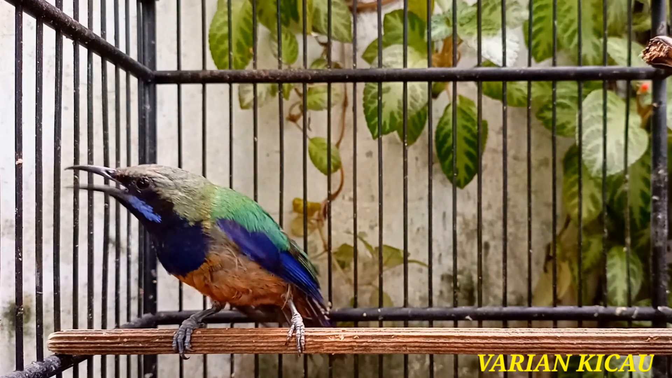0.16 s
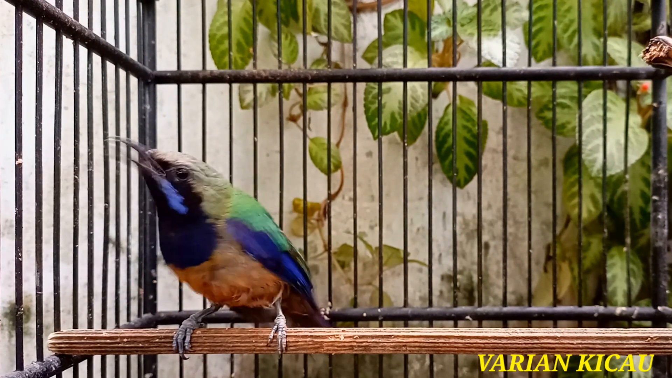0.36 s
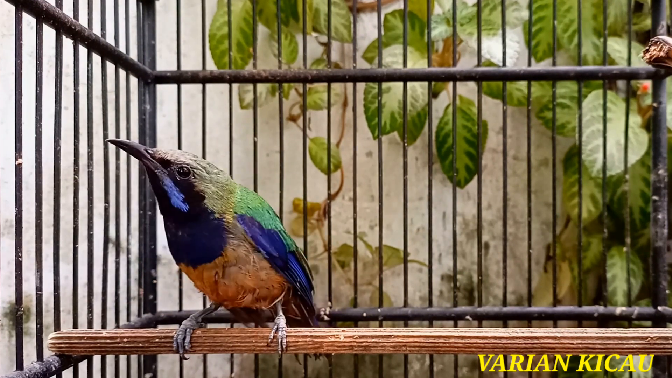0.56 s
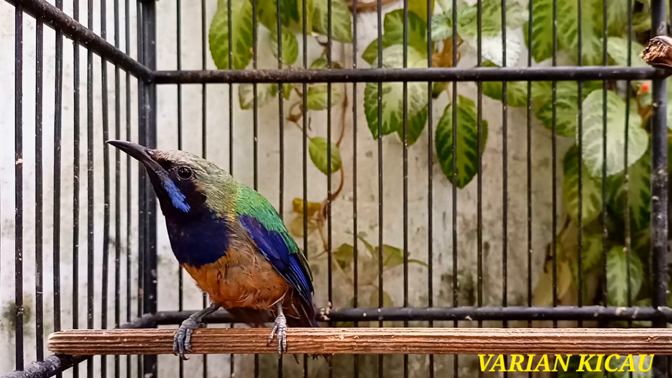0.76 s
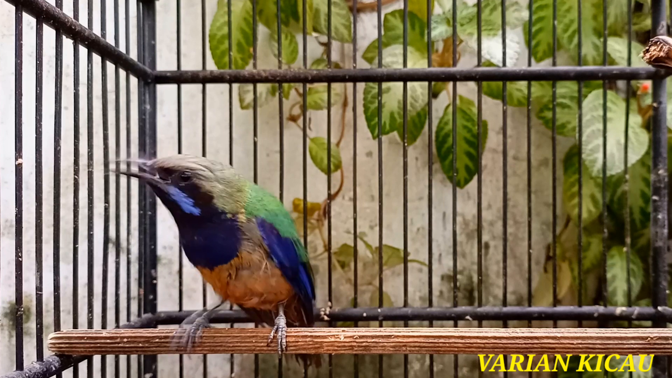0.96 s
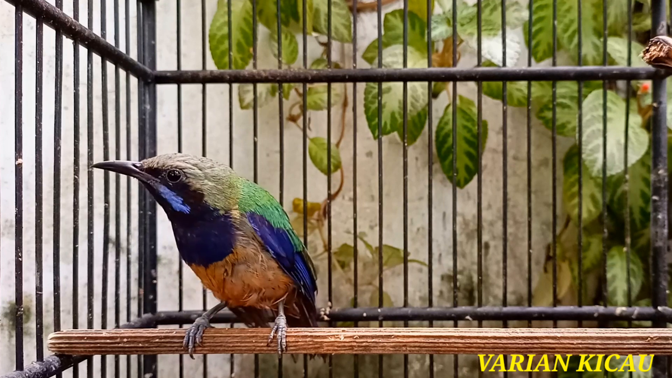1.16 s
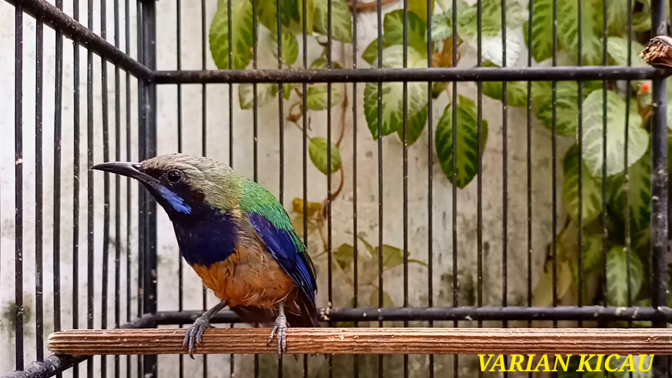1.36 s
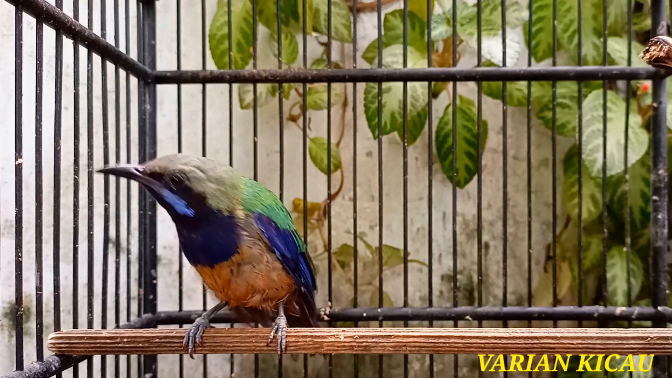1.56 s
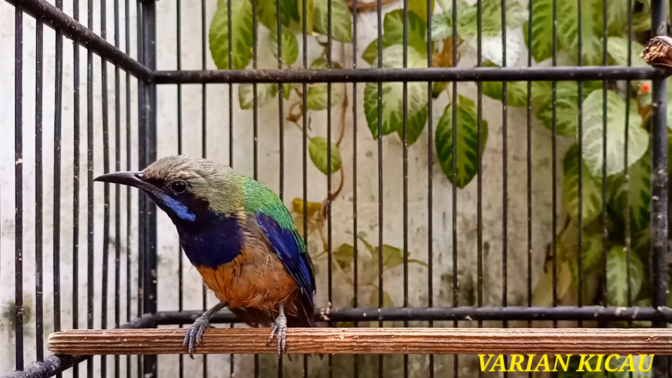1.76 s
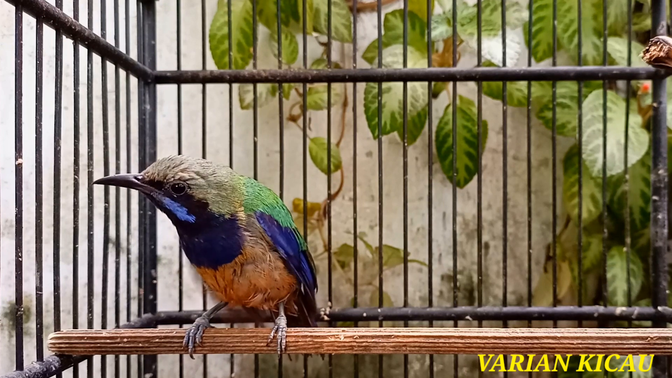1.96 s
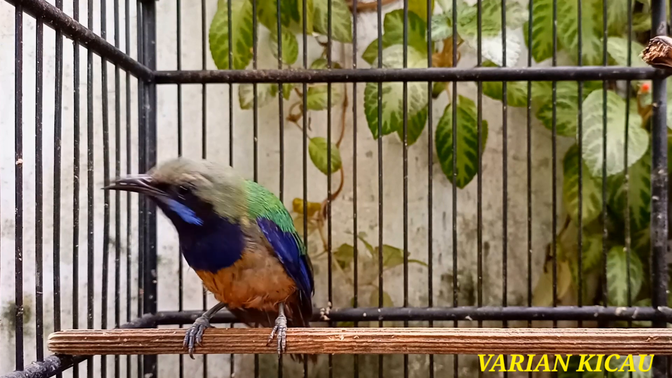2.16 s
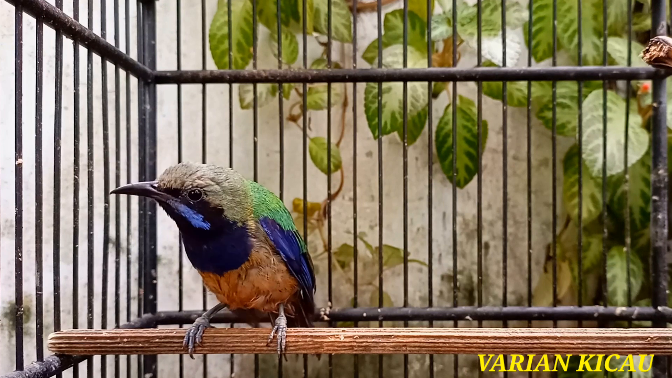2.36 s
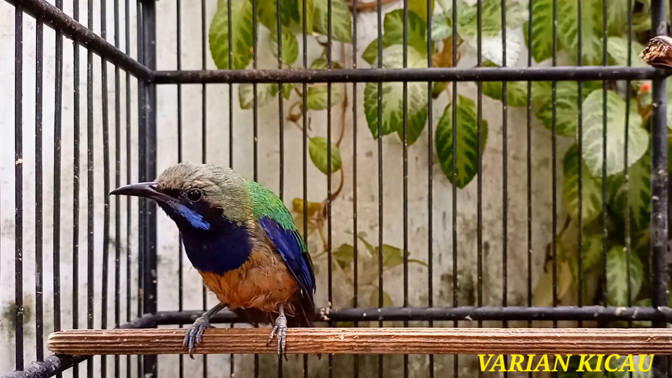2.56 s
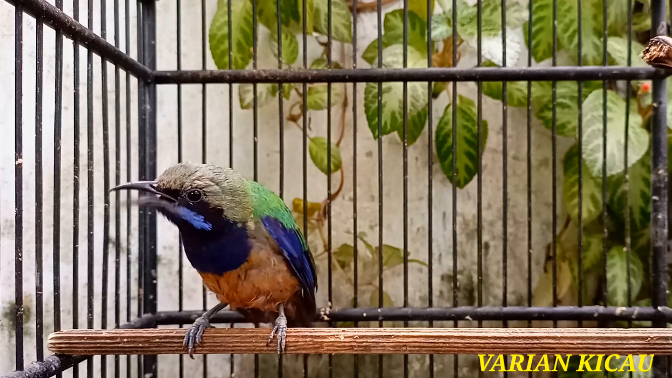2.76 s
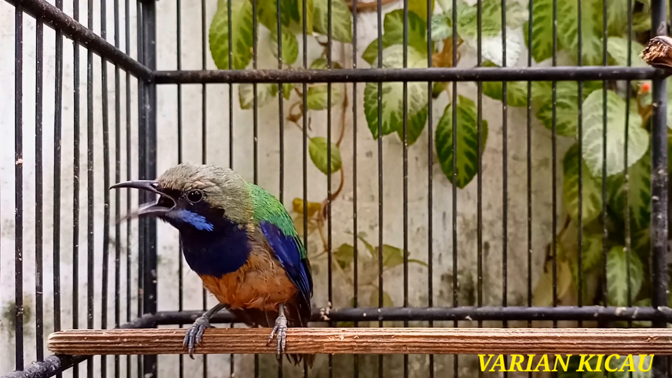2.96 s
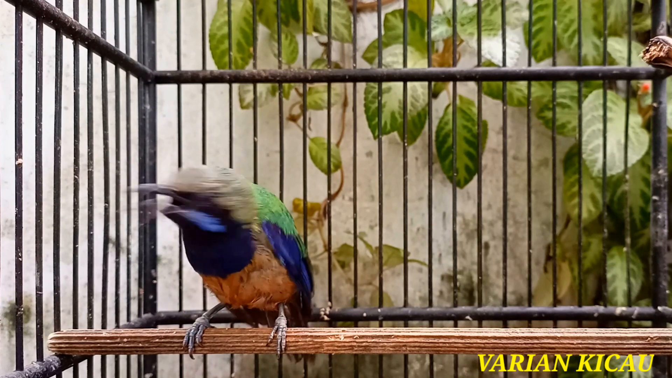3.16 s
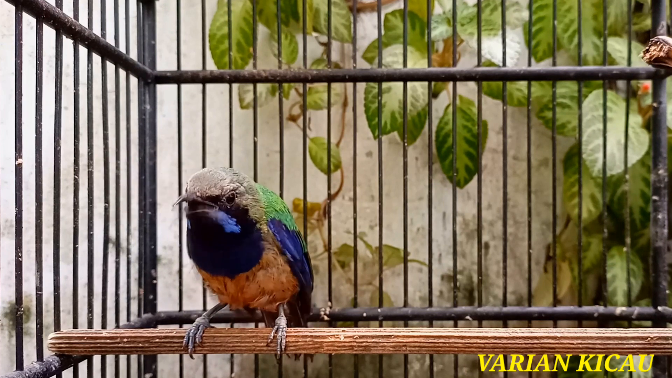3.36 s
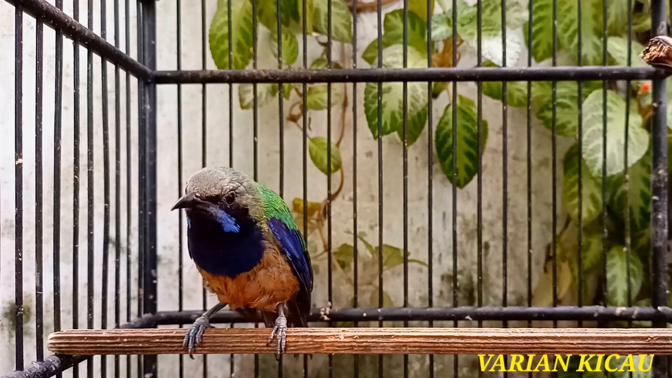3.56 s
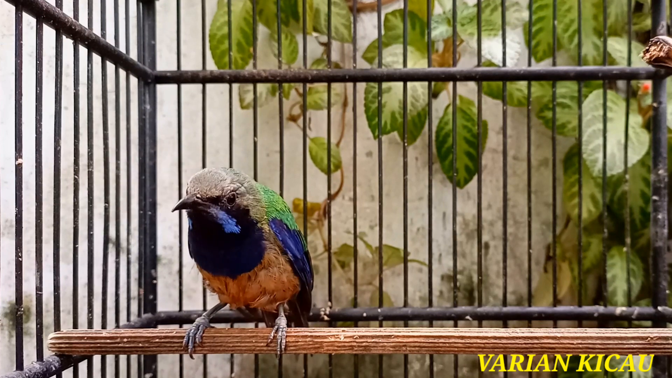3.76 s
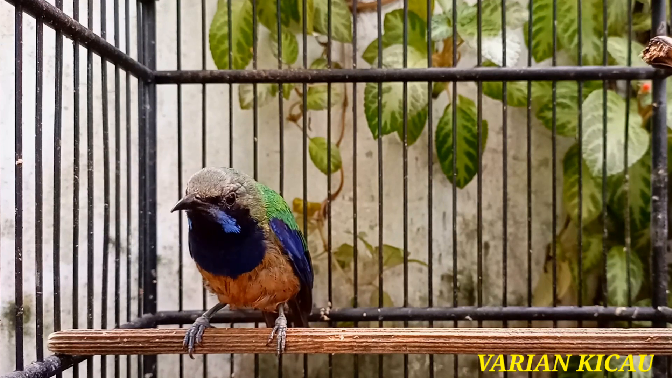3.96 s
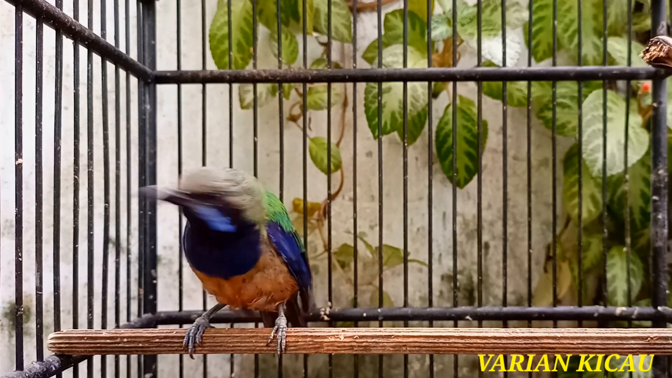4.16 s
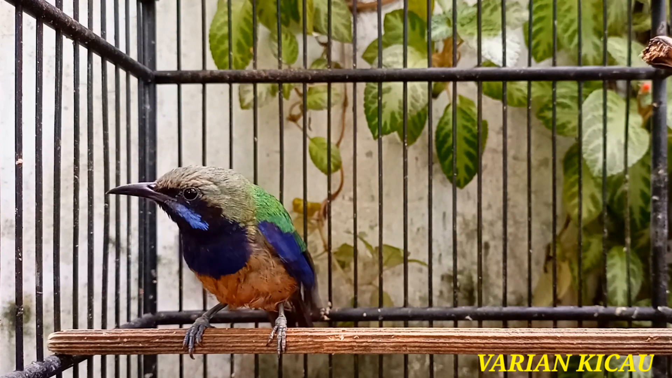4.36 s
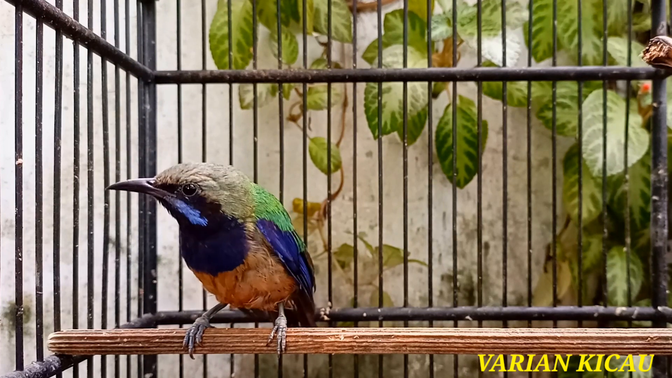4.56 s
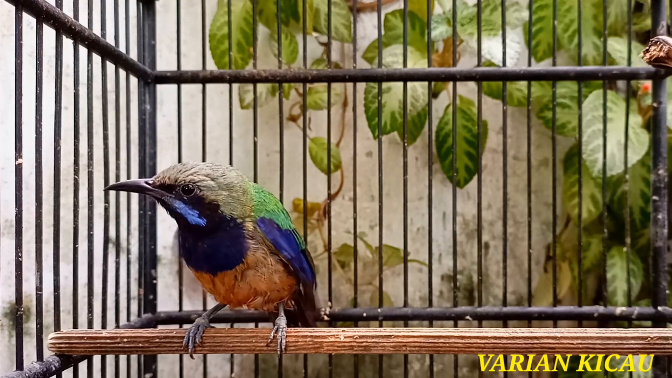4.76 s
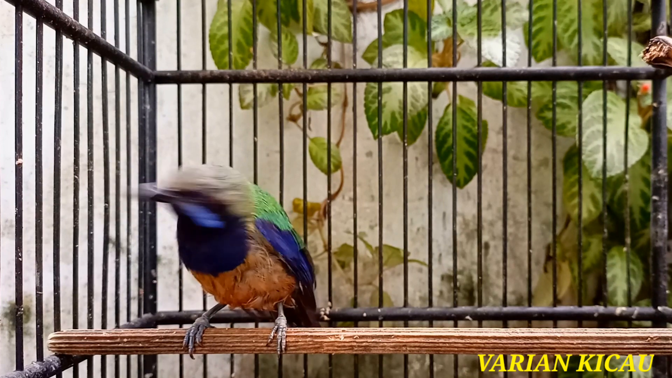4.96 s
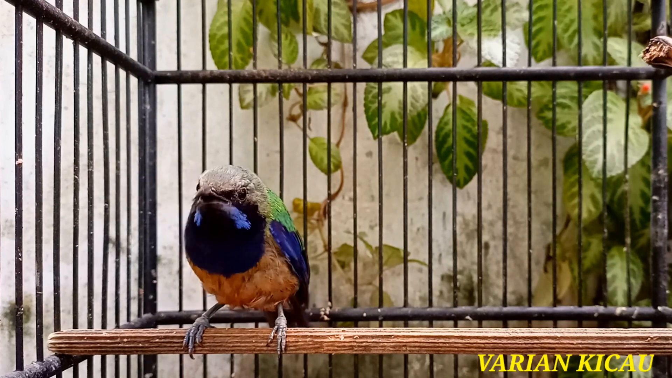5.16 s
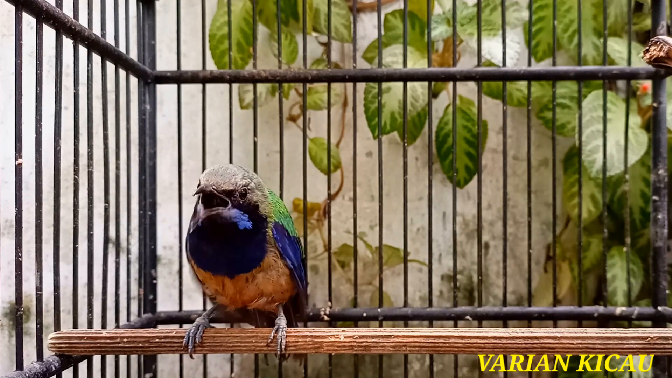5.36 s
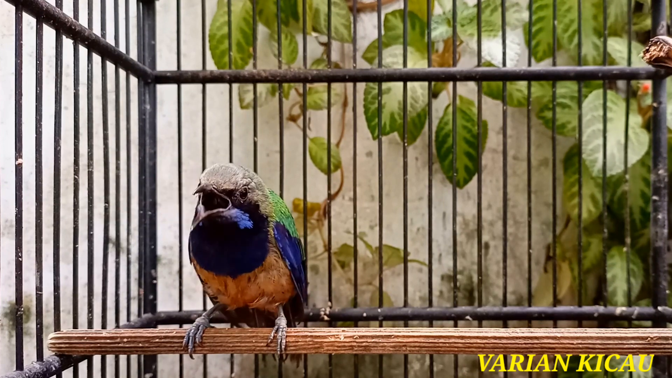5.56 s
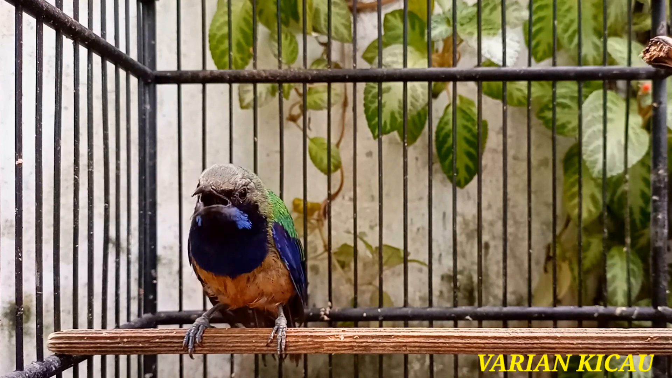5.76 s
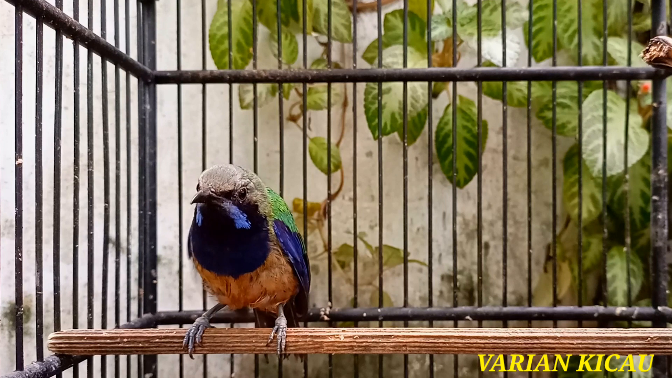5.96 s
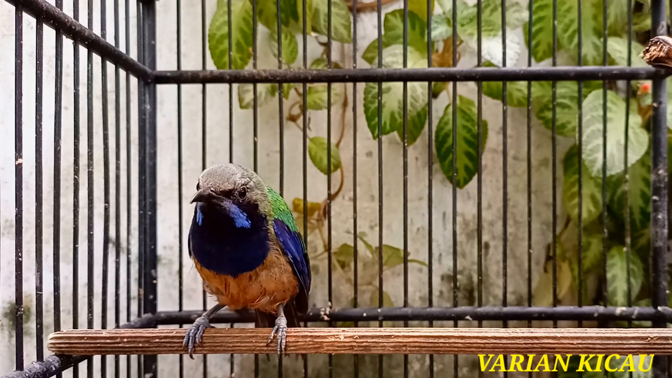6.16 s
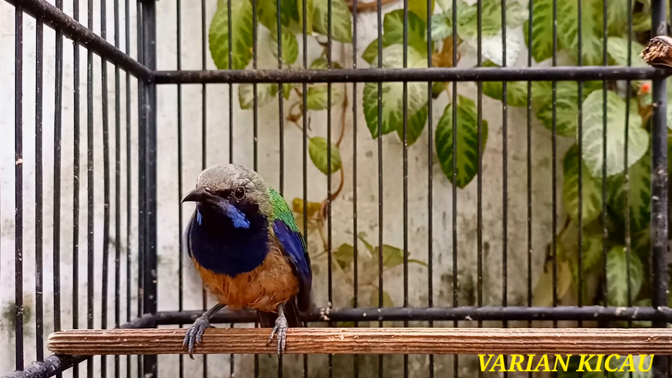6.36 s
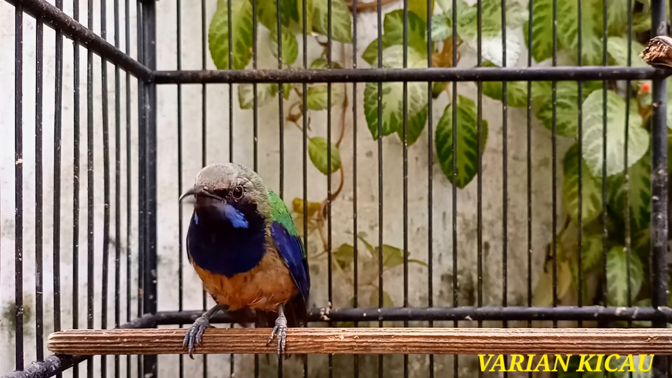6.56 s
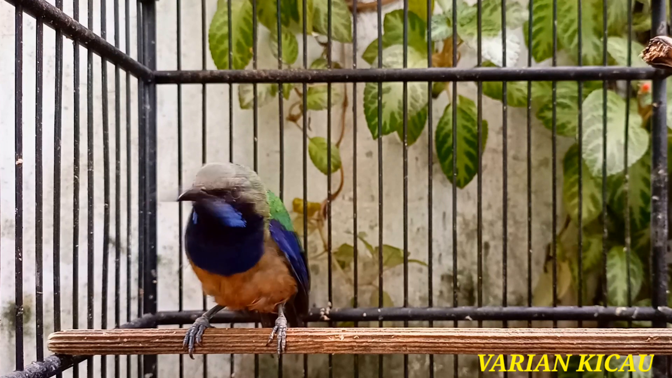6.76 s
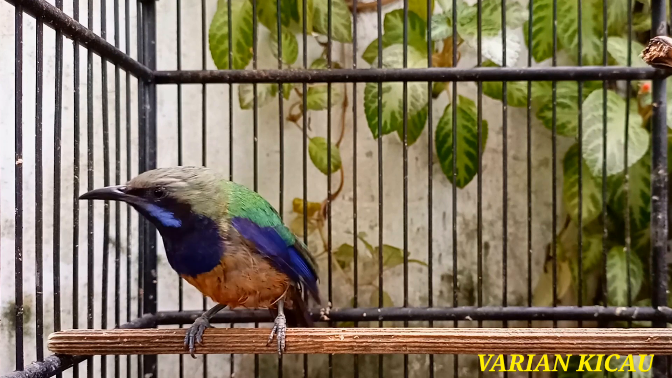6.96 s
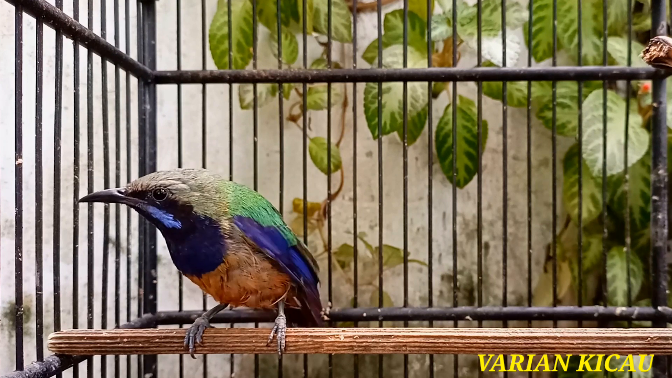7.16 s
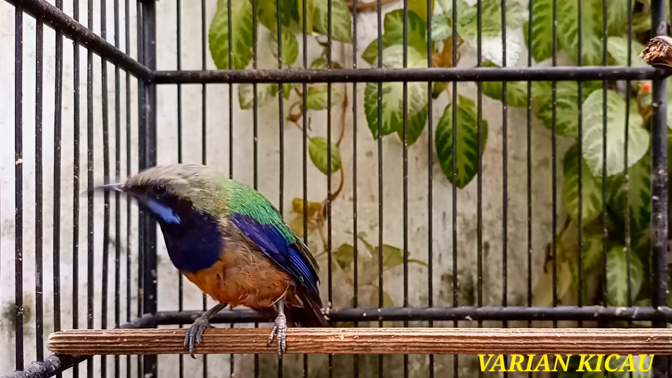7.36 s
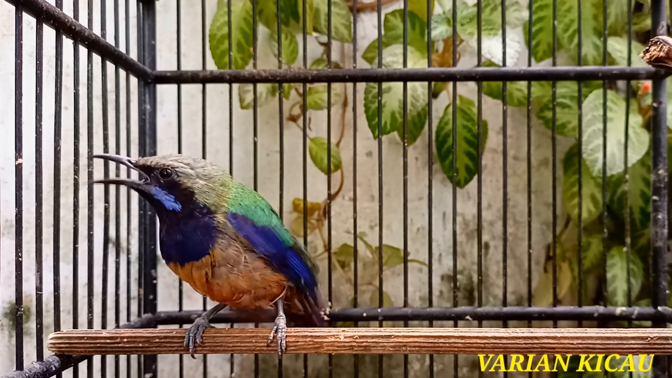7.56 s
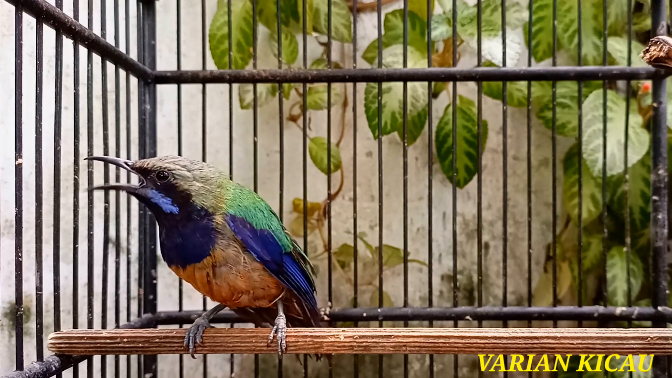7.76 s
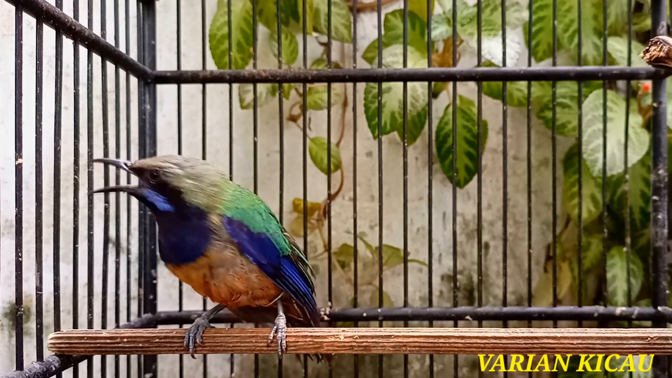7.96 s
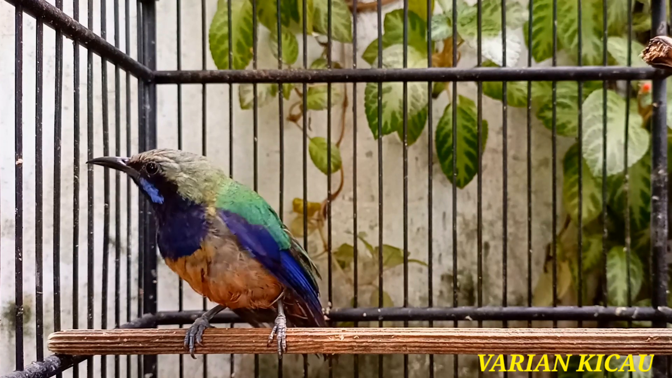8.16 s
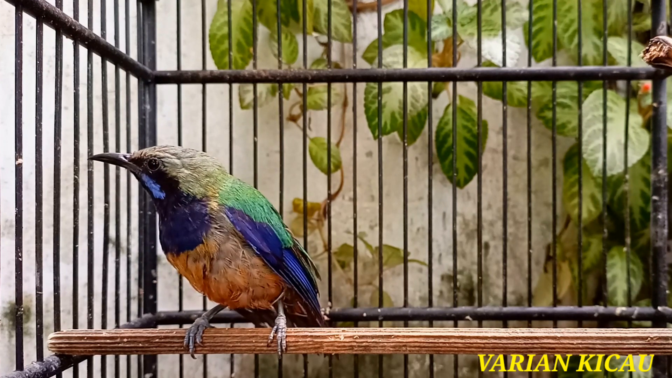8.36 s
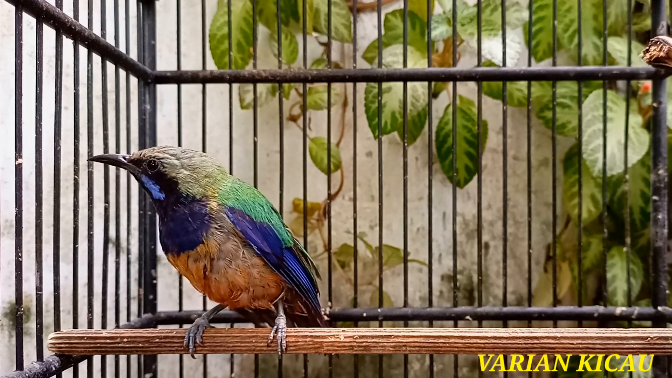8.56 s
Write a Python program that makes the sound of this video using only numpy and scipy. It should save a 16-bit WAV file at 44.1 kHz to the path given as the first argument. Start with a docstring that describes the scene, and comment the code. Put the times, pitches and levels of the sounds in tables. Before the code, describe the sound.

Close bird song: rasping, pulsed trills and piercing short falling chirps take turns, with brief wall echoes and a soft low rumble behind.

```python
"""A caged songbird near a wall opens with a buzzy trill, whose notes arch a whistle over a rough pulsed voice.
Two chirps follow: in each, a high voice slides down and breaks as a low voice takes over.
A second trill, a chirp, a third trill, a chirp and a last trill come next; echoes and a noise tail answer them.
Behind run a low hum in stretches of changing pitch, small sine thumps of the cage, and noise that drifts
unevenly in level; a faint wavering tone comes midway, and one far chip falls before the last trill."""
import sys
import numpy as np
from scipy import signal
from scipy.io import wavfile
from scipy.ndimage import uniform_filter1d

SR = 44100
rng = np.random.default_rng(int(sys.argv[2]) if len(sys.argv) > 2 else 0)


def bounce(signal):
    """Save signal as a 16-bit WAV file at the path given by the first command-line argument."""
    frames = np.transpose(np.atleast_2d(signal))
    limited = np.clip(frames, -1, 1)
    pcm = np.round(limited * 32767).astype(np.int16)
    wavfile.write(sys.argv[1], SR, pcm)


N = 380583


def gain_of(db):
    """Amplitude factor of a level in dB."""
    return 10 ** (np.asarray(db) / 20)


def evened(x):
    """The signal brought to rms 1."""
    return x / np.sqrt(np.mean(x ** 2) + 1e-20)


def read(points, hz):
    """Reads a curve of (frequency, value) points along a logarithmic frequency axis."""
    f, value = np.transpose(points)
    return np.interp(np.log(hz + 1), np.log(f + 1), value)


def add(mix, s, sound):
    """Lays a sound into the mix at s seconds, trimming what falls outside."""
    at = round(s * SR)
    sound = sound[max(-at, 0):]
    part = mix[max(at, 0):][:len(sound)]
    part += sound[:len(part)]


def wobble(n, hz):
    """Smooth chance of rms 1 that changes about hz times a second."""
    pad = round(SR / hz)
    noise = rng.standard_normal(n + 2 * pad)
    twice = uniform_filter1d(uniform_filter1d(noise, pad), pad)
    return evened(twice)[pad:-pad]


# trill notes: (top of the arch [s], length [ms], whistle level before the throat [dB], starting pitch [Hz])
TRILL_NOTES = [(0.004, 49.6, -17, 1770), (0.057, 56, -18.5, 1775), (0.106, 42.3, -18, 1750),
               (0.159, 37.6, -16, 1790), (0.24, 39.5, -20.5, 1507), (0.334, 45.5, -19.5, 1476),
               (0.416, 53.7, -21, 1497), (0.508, 51, -21, 1470), (0.612, 43.2, -21, 1474),
               (2.964, 45.7, -25, 1494), (3.002, 32, -14, 1996), (3.051, 31, -14.5, 1998),
               (3.091, 27, -15.5, 1963), (3.103, 28.8, -13.5, 2026), (3.148, 32, -13.5, 1970),
               (3.195, 36.4, -13, 2073), (3.241, 25, -17.5, 1978), (3.256, 26, -13.5, 2065),
               (3.308, 30.8, -14, 1998), (3.387, 39, -19, 1517), (3.405, 21, -23, 1555),
               (3.485, 35, -19.5, 1476), (3.597, 23.2, -23, 1447), (3.615, 29, -20, 1465),
               (5.39, 42.2, -19, 1768), (5.402, 30.3, -16.5, 1723), (5.437, 27.8, -14.5, 1791),
               (5.478, 22.6, -12.5, 1844), (5.527, 29.7, -15, 1933), (5.577, 33.5, -14.5, 1985),
               (5.632, 34.6, -13.5, 2080), (5.679, 26, -11, 2155), (5.73, 25.4, -11, 2394),
               (5.782, 27.8, -11.5, 2423), (5.834, 23.4, -11, 2583), (5.883, 21, -11, 2523),
               (5.939, 26, -12.5, 2694), (5.991, 21, -30.5, 1513), (7.752, 38, -21, 1670),
               (7.787, 21.8, -17, 1767), (7.801, 18.7, -16, 1831), (7.842, 36, -18, 1780),
               (7.886, 31.6, -15.5, 1990), (7.905, 21.3, -22, 1896), (7.944, 38.7, -17.5, 1873),
               (7.986, 29, -14, 2080), (8.036, 24, -13, 2170), (8.08, 28.5, -13.5, 2185),
               (8.095, 19, -17, 2080), (8.134, 25.3, -10.5, 2235), (8.185, 18, -12.5, 2323),
               (8.231, 21.4, -12, 2340), (8.244, 15.3, -17.5, 2290), (8.289, 28.2, -14, 2377)]
# turns of the head: (time [s], share heard side-on [0-1])
HEAD_TURNS = [(0, 0.93), (3.33, 0.84), (3.35, 0.1), (6.5, 0), (7.5, 0.9), (8.0, 0.44), (8.3, 0.15)]
# the throat's 3 kHz ring, a peak side-on and a dip from the front: (centre [Hz], width [Hz], lift [dB])
SIDE_RING = (3100, 110, 8.8)
FRONT_RING = (3100, 370, -4)


def trills():
    """All notes through the throat, crossfaded between side-on and frontal colour as the head turns."""
    out = np.zeros(N)
    for row in TRILL_NOTES:
        add(out, *voiced(*row))
    side = np.clip(np.interp(np.arange(N) / SR, *np.transpose(HEAD_TURNS)), 0, 1)
    return throat(side * out, SIDE_RING) + throat((1 - side) * out, FRONT_RING)


# how the starting pitch shapes a note; a tighter, higher start gives a purer one:
# (starting pitch [Hz], whistle top [Hz], rasp top [Hz], rasp against whistle [dB],
#  share of the note spent rising [0-1], lingering on the foot [power of the climb], slackness [0-1])
VOICE_BY_PITCH = [(1510, 6150, 3040, 10.5, .62, .9, 0.94), (1781, 7300, 3300, 3.5, 0.72, 2.4, .3),
                  (2054, 7300, 3200, 0.5, .6, 2.0, 0.1), (2260, 7350, 3100, -7, 0.69, 4.1, 0.2),
                  (2770, 7400, 3100, -7, 0.99, 3.6, 0.08)]


def voiced(s, length_ms, level_db, start_hz):
    """Sets a note's arch, rasp and slackness from the tightness of voice its starting pitch implies."""
    starts, *columns = np.transpose(VOICE_BY_PITCH)
    top_hz, rasp_hz, rasp_db, share, linger, slack = (np.interp(start_hz, starts, c) for c in columns)
    rise_ms, fall_ms = share * length_ms, (1 - share) * length_ms
    return note(s, rise_ms, fall_ms, top_hz, level_db, level_db + rasp_db,
                start_hz, rasp_hz, linger, np.clip(slack, 0, 1))


FOOT_DB = -12.5  # clean tone on the rise, against the rasp


def note(s, rise_ms, fall_ms, top_hz, whistle_db, rasp_db, start_hz, rasp_hz, linger, slack):
    """One arch: both voices climb, turn and fall back; the rasp is a pulse train that grows unsteady."""
    rise = np.arange(-1, 0, 1000 / SR / max(rise_ms, 1))
    fall = np.arange(0, 1, 1000 / SR / max(fall_ms, 1))
    u = np.concatenate([rise, fall])  # -1 at the start, 0 at the top, 1 at the end
    n, bow, rising = len(u), np.cos(np.pi / 2 * u), u < 0
    arch = bow ** np.where(rising, linger, 1.1)
    rough = np.where(rising, arch, 1)

    # whistle: a tone and an equally strong octave
    hz = (start_hz + (top_hz - start_hz) * arch) * (1 + (0.014 + 0.095 * slack) * wobble(n, 900))
    phase = 2 * np.pi * np.cumsum(hz) / SR
    whistle = np.sin(phase) + np.sin(2 * phase)
    # fast random flutter of the level blurs the whistle into a fuzzy band
    whistle *= 1 + 0.22 * wobble(n, 1700)
    # the way down is fainter
    whistle *= np.where(rising, arch ** 1.2, bow ** 2.8)

    # rasp: nine partials with spread phases, kept below the top of the band
    pitch = (start_hz + (rasp_hz - start_hz) * arch) * (1 + .04 * rough * wobble(n, 800))
    turns = 2 * np.pi * (np.cumsum(pitch) / SR + rng.random())
    pulses = sum(np.cos(k * turns + .7 * k * k) * (k * pitch < SR / 2.3) for k in range(1, 10))
    # the slacker the voice, the more strong and weak pulses alternate and the more air leaks through
    pulses *= 1 + 1.8 * slack * np.cos(turns / 2)
    unsteady = evened(pulses) * (1 + 2.5 * rough * wobble(n, 1200))
    air = (0.14 + 0.35 * slack) * rough * rng.standard_normal(n)
    swell = bow ** np.where(rising, 1.3 - .5 * slack, .9)
    rasp = evened(unsteady + air) * swell * gain_of(1.4 * wobble(n, 230))

    # foot: a clean tone that swells and fades within the rise
    foot = 1.2 * (1 - 0.21 * slack) * np.cos(turns) + np.cos(2 * turns)
    foot += 0.77 * slack * np.cos(turns / 2)
    foot *= np.sin(np.pi * np.clip(-u, 0, 1))
    rough_voice = gain_of(rasp_db) * (rasp + gain_of(FOOT_DB) * foot)
    return s - rise_ms / 1000, np.sqrt(2) * gain_of(whistle_db) * whistle + rough_voice


# broad colour of throat and beak: (frequency [Hz], level [dB])
THROAT_COLOUR = [(450, -55), (800, -34.5), (1300, -35.5), (2500, -20.5), (3400, -13), (5200, -4),
                 (6300, -4), (7400, -6), (8300, -11), (10500, -17), (16000, -26.5)]
# narrow resonances of windpipe and beak: (centre [Hz], width [Hz], lift [dB])
PIPE_RESONANCES = [(740, 200, 7), (1820, 250, 9), (3760, 300, 8.5), (4414, 280, 7.5), (6340, 180, 3.5),
                   (6600, 250, 3.5), (7330, 350, 3.5)]


def throat(x, ring):
    """The broad throat colour with its narrow resonances, as one filter."""
    hz = np.linspace(0, SR / 2, 1025)
    lift_db = sum(db / (1 + (2 * (hz - f) / width) ** 2) for f, width, db in PIPE_RESONANCES + [ring])
    taps = signal.firwin2(1023, hz, gain_of(read(THROAT_COLOUR, hz) + lift_db), fs=SR)
    return signal.oaconvolve(x, taps, "same")


# chirps: (break of the high voice [s], high voice level [dB], low voice level [dB], speed [factor])
CHIRPS = [(1.158, -15, -16.5, 0.97), (2.338, -16, -16.5, 0.94), (4.278, -14.5, -16, 0.94),
          (6.745, -15, -15.5, 1)]
# the two voices: (time from the break at speed 1 [ms], pitch [Hz], level against its voice [dB])
HIGH_VOICE = [(-33, 8750, -29.5), (-27.5, 8370, -1), (-23.5, 7800, -5.5), (-12.5, 7500, 0.5),
              (-5.5, 7350, -2.5), (5, 5410, -5), (4, 5300, -21)]
LOW_VOICE = [(-7, 11000, -34), (-2.5, 4600, -8.5), (2.5, 4200, -6), (11.5, 3900, -7.5), (16.5, 3750, 0.5),
             (33, 3720, -3.5), (43, 4000, -20.5)]
# partials from the 2nd up: (level against the fundamental [dB])
HIGH_OVERTONES = [-27.5]
LOW_OVERTONES = [-22.5, -25, -35.5]
# faint fuzz of air: (time from the break at speed 1 [ms], centre [Hz], level against the low voice [dB])
AIR_FUZZ = [(-21, 4100, -44.5), (-11.5, 4100, -36), (-6.5, 4500, -38.5), (-1.5, 9700, -23.5),
            (0, 9400, -22), (9.5, 13000, -25.5), (20.5, 3900, -38)]


def chirps():
    """The high voice slides down and breaks as the low voice takes over, with a fuzz of air around it."""
    out = np.zeros(N)
    for s, high_db, low_db, speed in CHIRPS:
        def placed(shape, db):
            return [(s + ms / speed / 1000, hz, db + d) for ms, hz, d in shape]

        add(out, *glide(placed(HIGH_VOICE, high_db), HIGH_OVERTONES))
        add(out, *glide(placed(LOW_VOICE, low_db), LOW_OVERTONES))
        # strong fast wavering spreads the tone into fuzz
        add(out, *glide(placed(AIR_FUZZ, low_db), waver=.09, flutter_db=5, rate_hz=860))
    return out


def glide(rows, overtones=(), waver=.004, flutter_db=2.0, rate_hz=300):
    """A sine with overtones led through rows of (time [s], pitch [Hz], level [dB]), wavering by chance."""
    s, hz, db = np.transpose(rows)
    t = np.arange(s[0], s[-1], 1 / SR)
    pitch = np.interp(t, s, hz) * (1 + waver * wobble(len(t), rate_hz))
    phase = 2 * np.pi * (np.cumsum(pitch) / SR + rng.random())
    tone = np.sin(phase)
    for k, overtone_db in zip(range(2, 6), overtones):
        tone = tone + gain_of(overtone_db) * np.sin(k * phase)
    level = gain_of(np.interp(t, s, db) + flutter_db * wobble(len(t), rate_hz))
    return s[0], np.sqrt(2) * level * tone * signal.windows.tukey(len(t), .1)


# early echoes off wall, bars and perch: (delay [ms], level against the direct sound [dB])
EARLY_ECHOES = [(1.3, -15.5), (3.1, -9.5), (5.2, -9.5), (8.0, -9.5), (11.5, -15)]


def yard(x, tail_db):
    """Direct sound, early echoes, and three tails fed in turn, cycling 3.1 times a second."""
    early = np.zeros(2000)
    early[0] = 1
    for ms, db in EARLY_ECHOES:
        early[round(ms * SR / 1000)] = gain_of(db)
    turn = np.arange(N) / SR * 2 * np.pi * 3.1  # the feeds cycle at 3.1 Hz
    late = sum(tail(x * np.sqrt(2 / 3) * np.cos(turn + k * np.pi / 3)) for k in range(3))
    return signal.oaconvolve(x, early / np.linalg.norm(early))[:N] + gain_of(tail_db) * late


# main decay of the yard: (frequency [Hz], t60 [s])
YARD_DECAY = [(500, 0.22), (2000, 0.26), (4000, 0.18), (7500, 0.22), (11000, 0.24), (16000, 0.11)]
LINGER_DB, LINGER_T60_S = -15, 0.54  # a weaker, slower part of the tail


def tail(x, start_ms=6):
    """Sparse taps of random sign, each band dying at its own speed."""
    taps, first = np.zeros(SR), round(start_ms * SR / 1000)
    at = np.arange(first, SR - 16, 16)
    taps[at + rng.integers(0, 16, len(at))] = rng.choice([-1., 1.], len(at))
    hz, t, z = signal.stft(taps, SR, nperseg=128)
    decay = gain_of(-60 * t / read(YARD_DECAY, hz)[:, None])
    linger = gain_of(LINGER_DB - 60 * t / LINGER_T60_S)
    dying = signal.istft(z * (decay + linger), SR, nperseg=128)[1]
    return signal.fftconvolve(x, dying / np.linalg.norm(dying))[:N]


# a far bird's falling chip: (time [s], pitch [Hz], level before the distance mix [dB])
FAR_CHIP = [(7.047, 5040, -76), (7.056, 6160, -53), (7.064, 6070, -55), (7.07, 4480, -61),
            (7.08, 3090, -64.5)]
# a faint wavering tone from far off: (time [s], pitch [Hz], level before the distance mix [dB])
FAINT_TONE = [(4.42, 1156, -84), (4.5, 1148, -79), (4.57, 1138, -78.5), (4.61, 1119, -81.5),
              (4.64, 1115, -83.5)]


def far_calls():
    """Two strongly wavering glides, weak in direct sound and full in the yard's tail."""
    far = np.zeros(N)
    add(far, *glide(FAR_CHIP, waver=0.12, flutter_db=4.5, rate_hz=1100))
    add(far, *glide(FAINT_TONE, waver=0.097, flutter_db=3.5, rate_hz=210))
    return 0.35 * far + tail(far)


# steady stretches of hum: (start [s], length [s], pitch [Hz], first level [dB], last level [dB])
HUM_STRETCHES = [(0.021, 0.63, 82.5, -53, -56.5), (0.652, 2.07, 85.04, -57.5, -61),
                 (3.72, 1.75, 70.87, -53, -57.5), (5.97, 0.45, 84.4, -47.5, -59),
                 (6.518, 1.08, 82.47, -48, -51.5)]
HUM_RISE_S, HUM_FALL_S, HUM_EDGE_DB = 0.017, 0.025, -18


def hum():
    """A wavering low tone with weak overtones; each stretch sets in quickly and sinks."""
    out = np.zeros(N)
    for s, length, hz, first_db, last_db in HUM_STRETCHES:
        end = s + length
        rows = [(s, hz, first_db + HUM_EDGE_DB), (s + HUM_RISE_S, hz, first_db),
                (end - HUM_FALL_S, hz, last_db), (end, hz, last_db + HUM_EDGE_DB)]
        add(out, *glide(rows, [-26, -30], waver=0.005, flutter_db=4.5, rate_hz=36))
    return out


# low thumps: (time [s], level at the start of the decay [dB], pitch [Hz], t60 [s])
THUMPS = [(1.135, -25.5, 231, 0.011), (3.153, -34.5, 106, 0.054), (4.255, -35, 180, 0.025),
          (6.724, -42, 198, 0.048), (7.639, -42, 70, 0.28), (7.749, -43, 62.6, 0.27)]


def thumps():
    """Soft short pushes through the cage and the microphone: dying sines that fade in over half a cycle."""
    out, t = np.zeros(N), np.arange(SR // 2) / SR
    for s, db, hz, t60 in THUMPS:
        fade_in = np.minimum(t * hz * 2, 1)
        add(out, s, gain_of(db - 60 * t / t60) * np.sin(2 * np.pi * hz * t) * fade_in)
    return out


# spectrum shape of the background: (frequency [Hz], relative density [dB per Hz])
FLOOR_SHAPE = [(13, -64.5), (22, -34), (32, -20.5), (61, 1), (80, -0.5), (94, -16), (150, -21.5),
               (233, -23), (477, -37), (1280, -47.5), (3950, -46), (4790, -45), (6840, -46), (10300, -58.5),
               (15600, -72.5)]
FLOOR_DB = -57.5  # rms of the whole background
# slow uneven drift in level: (time [s], low noise [relative dB], noise around 5 kHz [relative dB])
LEVEL_DRIFT = [(0, -3, 2), (.9, -0.5, 1), (1.601, -0.5, -2), (1.95, -4.5, 9), (2.2, -1, -1.5),
               (2.798, 0.5, -0.5), (3.298, -3.5, 4), (3.901, 1.5, -1.5), (4.6, 1.5, 1), (5.1, -1, 1),
               (5.6, -3, 3.5), (6.1, -0.5, -2.5), (6.403, -0.5, 3), (6.999, -1.5, -0.5), (7.399, 2, 1.5),
               (7.702, -1, 3.5), (8.1, -3.5, 2.5), (8.63, 3.5, 6)]


def background():
    """Random short-time spectra with drifting patches; low noise and noise around 5 kHz drift in level."""
    frames, hz = N // 256 + 5, np.fft.rfftfreq(1024, 1 / SR)
    a, b, patches = rng.standard_normal((frames, 513, 3)).T
    patches = evened(uniform_filter1d(uniform_filter1d(patches, 8, 0), 14, 1))
    t = np.arange(frames) * 256 / SR
    s, low_db, high_db = np.transpose(LEVEL_DRIFT)
    low = 1 / (1 + (hz / 400) ** 4)
    high = np.exp(-(np.log((hz + 1) / 5000) / 0.51) ** 2)
    drift = np.outer(low, np.interp(t, s, low_db)) + np.outer(high, np.interp(t, s, high_db))
    still = gain_of(read(FLOOR_SHAPE, hz))[:, None]
    # the patches are a little stronger in the low noise
    z = (a + 1j * b) * still * gain_of((3.0 + 0.99 * low[:, None]) * patches + drift)
    return gain_of(FLOOR_DB) * evened(signal.istft(z, nperseg=1024, noverlap=768)[1][:N])


def scene():
    """The bird in its yard, then the layers behind it."""
    birds = yard(trills() + chirps(), tail_db=-13.5) + far_calls()
    return (birds + hum() + thumps() + background())[None]


def coloured(x, points, count):
    """Filters x by a level curve, with count taps."""
    hz = np.linspace(0, SR / 2, 2 * count + 3)
    return signal.oaconvolve(x, signal.firwin2(count, hz, gain_of(read(points, hz)), fs=SR), "same")


# microphone colour: (frequency [Hz], level [dB])
MICROPHONE = [(30, -12.5), (60, 1), (8000, 1.5), (10500, -6), (12600, -16.5), (14000, -7.5), (15200, 7)]
EDGE_HZ = 15650  # upper band limit


def record(dry):
    """Microphone colour, soft overload on the loudest peaks, then the band limit."""
    soft = 0.88 * np.tanh(coloured(dry[0], MICROPHONE, count=4095) / 0.83)
    band_limit = signal.firwin(511, EDGE_HZ, window=("kaiser", 9), fs=SR)
    return signal.oaconvolve(soft, band_limit, "same")[None]


dry = scene()
out = record(dry)
bounce(out)
```